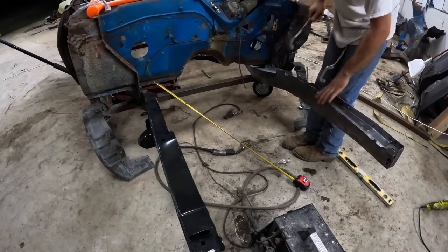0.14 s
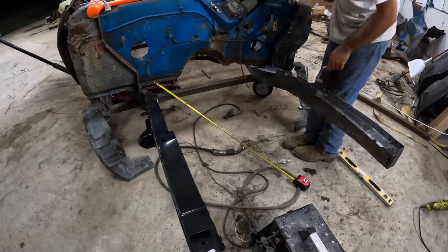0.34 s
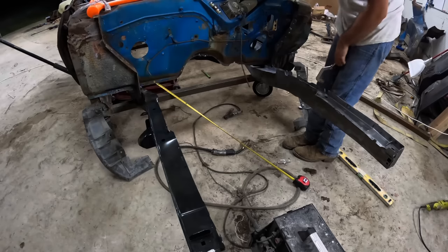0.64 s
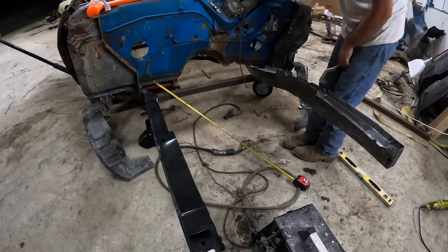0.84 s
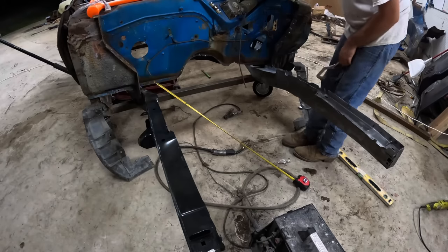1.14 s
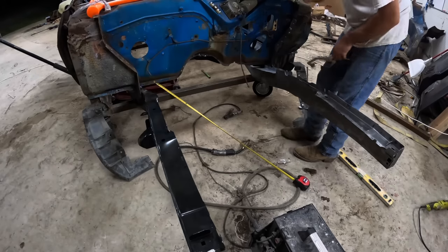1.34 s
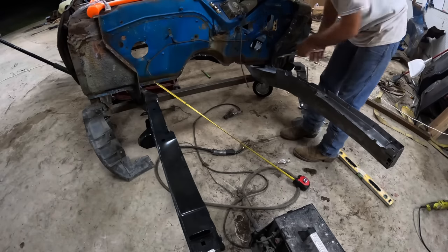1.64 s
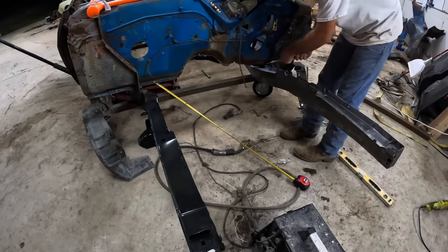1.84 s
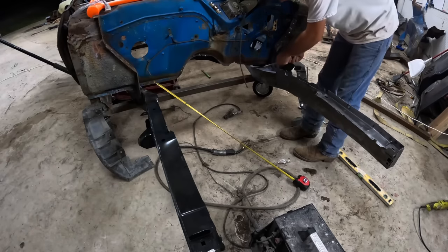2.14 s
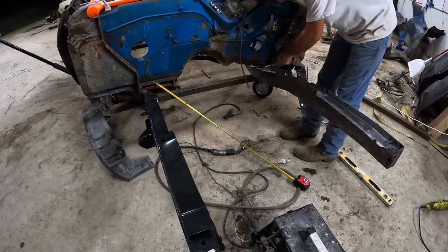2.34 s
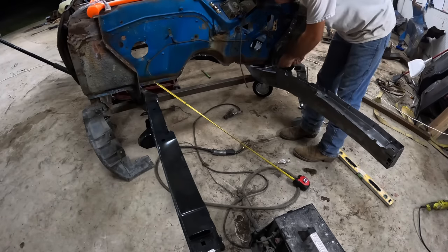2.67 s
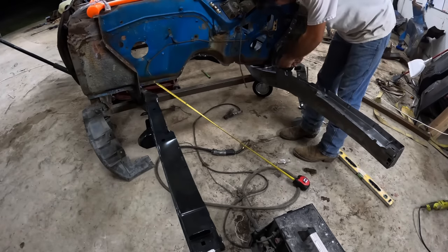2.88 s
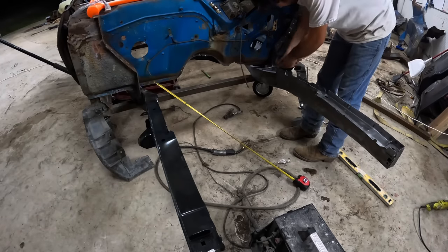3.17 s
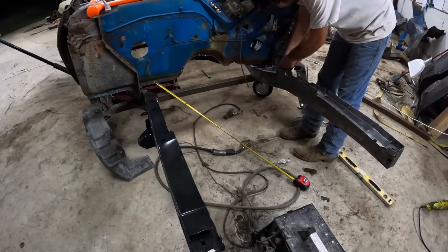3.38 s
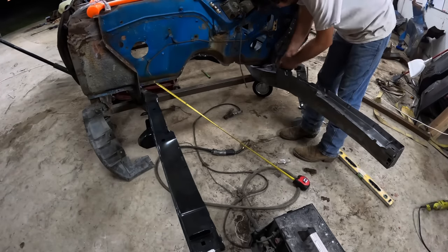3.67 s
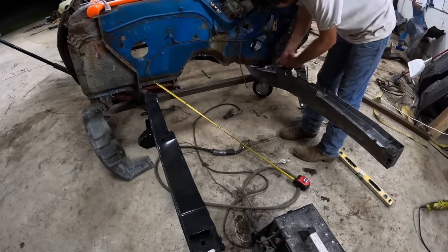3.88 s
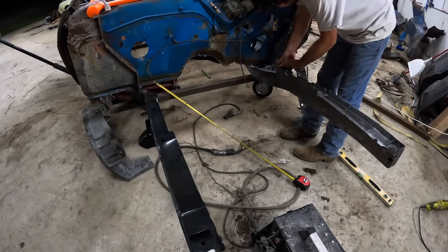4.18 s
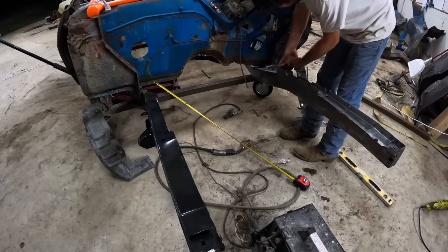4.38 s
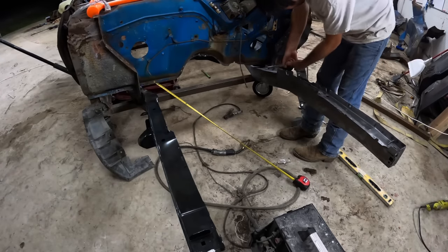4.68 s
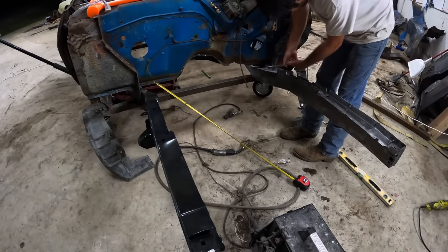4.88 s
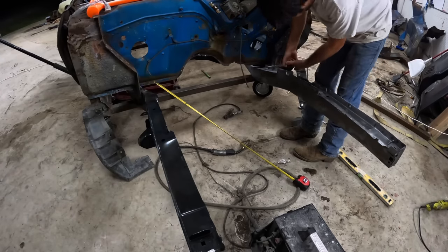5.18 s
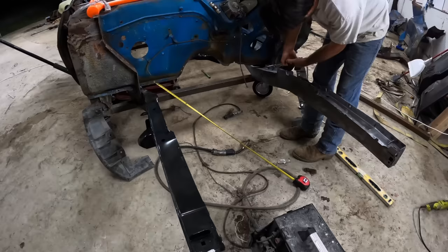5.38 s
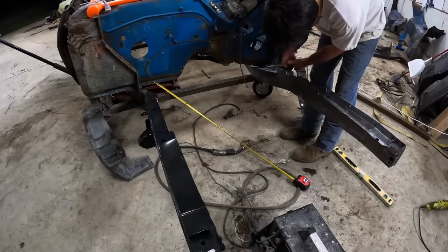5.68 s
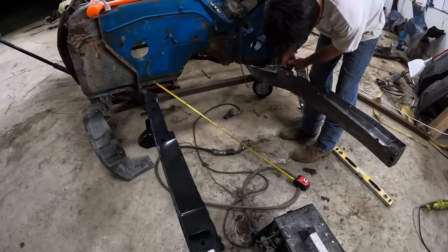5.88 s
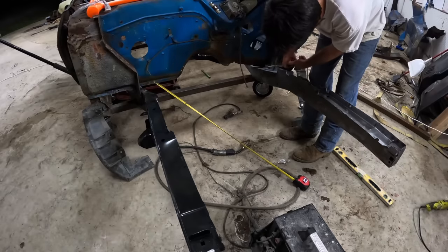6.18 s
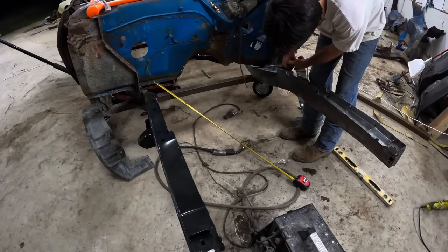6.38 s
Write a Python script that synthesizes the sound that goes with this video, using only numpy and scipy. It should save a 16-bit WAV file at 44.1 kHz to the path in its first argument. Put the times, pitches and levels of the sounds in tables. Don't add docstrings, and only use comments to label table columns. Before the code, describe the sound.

Hard, dry steel clanks with short booming body and high clamp rings come in uneven clusters, with small ticks and brief gritty rubs between. The shop adds a short tail. A distant truck swells behind them, rushes broadly as it crosses the doorway, then fades into quiet outdoor air with very faint insects.

```python
import sys
import numpy as np
from scipy import signal
from scipy.fft import rfft, irfft
from scipy.io import wavfile
from scipy.ndimage import uniform_filter1d

SR = 44100
rng = np.random.default_rng(int(sys.argv[2]) if len(sys.argv) > 2 else 0)


def put_to_file(sound):
    columns = np.atleast_2d(sound).T
    safe = np.clip(columns, -1, 1)
    whole_steps = np.round(safe * 32767)
    wavfile.write(sys.argv[1], SR, whole_steps.astype(np.int16))


def natural_amplitude(level_db):
    exponent = np.asarray(level_db, float) / 20
    return 10 ** exponent


N = 287532

# (frequency [Hz], density [dB per Hz])
AIR_SPECTRUM = [(13, -30), (22, 10.5), (44, 13.5), (79, -19), (99, 13), (180, -15.5), (286, -8), (522, -52),
                (853, -81), (1150, -16), (3000, -71), (4770, -44.5), (5170, -44), (11700, -67),
                (15000, -93)]
AIR_DB = -45.5
INSECT_HZ, INSECT_WIDTH_HZ, INSECT_DB = 4700, 170, -80.5
# (frequency [Hz], likeness [0-1])
PORT_LIKENESS = [(25, 0.9995), (70, 0.9999), (180, 1), (540, 0.97), (1630, 0.68), (4900, 0.78),
                 (14700, 0.44)]

# (time [s], drone level [dB], second order level [dB])
ENGINE_LEVELS = [(0, -50.5, -60), (.3, -43, -64.5), (1.0, -35, -56.5), (1.5, -57.5, -57),
                 (1.63, -35, -51.5), (2.0, -27.5, -64), (2.5, -29, -48.5), (2.72, -38.5, -42),
                 (2.86, -25.5, -65), (3.28, -22.5, -51), (3.62, -49, -39), (3.9, -32, -31),
                 (4.2, -25.5, -33.5), (4.6, -31, -42.5), (4.75, -40.5, -39), (5.3, -34, -48.5),
                 (5.58, -47, -54.5), (6.52, -76.5, -69.5)]
# (time [s], level [dB])
ROAR_LEVELS = [(0, -66.5), (.9, -58.5), (1.4, -56), (1.9, -49.5), (2.4, -41), (2.7, -43), (3.2, -51),
               (3.5, -41.5), (3.75, -37.5), (4, -40.5), (4.35, -48), (4.95, -52), (5.6, -58.5), (6.1, -62),
               (6.52, -68.5)]
# (frequency [Hz], density [dB per Hz])
ROAR_SPECTRUM = [(600, -38), (800, -16), (1000, -1), (1270, -1.5), (1600, -7), (2300, -16), (4000, -29.5),
                 (6000, -61)]
# (frequency [Hz], density [dB per Hz])
RUSH_SPECTRUM = [(470, -20), (800, -5), (1040, -5), (2400, -14), (4600, -18.5), (7400, -25), (8300, -35.5),
                 (12200, -44), (15000, -57.5)]
# (frequency [Hz], density [dB per Hz])
DRUMMING_SPECTRUM = [(250, -20), (330, -3.5), (450, 2), (600, -1), (800, -1.5), (1000, -8.5), (3000, -57)]
# (frequency [Hz], density [dB per Hz])
RUMBLE_SPECTRUM = [(90, 18.5), (130, 15), (250, 13.5), (330, 4), (450, -46.5)]
# (level [dB], share of the roar's swing [ratio], gain in the door [dB], gain with exhaust facing back [dB])
RUSH_FOLLOWS = (-60.5, 0.9433, 6.5, -0.7)
DRUMMING_FOLLOWS = (-62.5, 0.9532, 11.5, 7)
RUMBLE_FOLLOWS = (-47, 0.66, 2.5, 7)
# same columns, the first as gain [dB]
DEEP_AIR_FOLLOWS = (-0.85, 0.2, .1, 0.34)
DEEP_AIR_HZ = 110
FIRING_HZ, PASSING_S, SPEED_M_PER_S, DISTANCE_M = 82.86, 3.4, 34, 119
DOOR_S, DOOR_WIDTH_S = 3.52, 0.61
TURN_S, TURN_WIDTH_S = 2.7, 0.5

# (frequency [Hz], difference [dB])
ROAD_SIDE = [(60, 1), (240, 0.5), (940, 1.5), (3720, 2), (14700, 3)]
# (frequency [Hz], difference [dB])
STEEL_SIDE = [(60, 0), (150, -.4), (380, -1), (940, -2.5), (2350, -3.5), (5890, -1.5), (9000, 0),
              (14700, 8)]
STEEL_LAG_S = -0.0000091
# (frequency [Hz], t60 [s])
SHOP_DECAY = [(100, 0.35), (400, 0.59), (1500, 0.37), (5000, 0.83), (12000, 0.87)]
SHOP_DB, SHOP_SIDE_DB = -9.5, -6.5
# (frequency [Hz], gain [dB])
STEEL_TO_MIC = [(40, -24), (90, 4), (200, -0.5), (7400, -1.5), (8300, -4.5), (12000, -6), (14300, -17),
                (14700, -35), (15500, -68)]

# (start [s], hold [s], level [dB], release [dB per s])
SCRAPE_STROKES = [
    (-.05, .05, -57, 83),
    (1.453, 0.074, -57, 207),
    (5.434, 0.074, -49, 134),
    (5.717, .03, -60.5, 200),
]
# (frequency [Hz], density [dB per Hz])
SCRAPE_SPECTRUM = [(240, -32), (400, -3.5), (854, -16), (1090, -7), (1370, -10), (1500, -14), (4530, -10),
                   (10700, -28.5), (15000, -41)]
SCRAPE_ATTACK_DB_PER_S = 252
# (time [s], level [dB], centre [Hz], t60 [s])
RATTLE_EVENTS = [(.08, -59, 450, .6), (.94, -25, 1380, .08), (.962, -30, 1100, .25),
                 (1.003, -28.5, 800, .12), (1.045, -30, 1050, .25), (1.085, -39, 3900, 0.48),
                 (1.194, -26, 650, .12), (1.225, -33, 900, .2), (1.29, -33, 1050, .25),
                 (1.33, -36, 700, .25), (2.205, -32, 600, .3), (2.468, -43, 8900, .55),
                 (2.498, -34, 1100, 0.17), (2.73, -44, 2800, 0.18), (2.828, -26, 2160, .07),
                 (2.84, -38, 1790, .25), (3.855, -29, 800, .3), (3.87, -34, 2800, .3),
                 (3.895, -28.5, 1500, 0.27), (4.052, -43.5, 6270, 0.099), (4.83, -40, 420, .4),
                 (5.742, -40.5, 4000, .2), (5.762, -24, 4200, .07), (5.8, -45, 10300, 0.36),
                 (5.86, -43, 4200, 0.18), (5.86, -36, 330, .8)]
RATTLE_OCTAVES, RATTLE_GRIT_DB, RATTLE_RISE_S = 0.4, 4, 0.002
# (time [s], peak [dB],
# frequency [Hz], t60 [s])
STEEL_PINGS = [(.965, -29, 3800, .12), (.94, -21.5, 2200, .05), (.95, -26, 2000, .1),
               (1.024, -24.5, 5000, 0.049), (1.025, -31, 5700, .04), (1.035, -34, 3800, .1),
               (1.043, -33, 6400, .06), (1.07, -37, 5900, .2), (1.203, -37, 3750, .1),
               (1.2, -28, 1150, 0.073), (1.215, -28, 900, 0.081), (1.255, -36, 1600, .05),
               (1.285, -29, 1200, .05), (2.729, -40, 3150, .1), (2.729, -37, 2550, .06),
               (2.827, -25, 1100, 0.052), (2.828, -28.5, 1550, 0.083), (2.468, -30, 9000, .04),
               (2.255, -22.5, 3500, .05), (2.262, -33, 5700, .08), (4.815, -22.5, 940, 0.074),
               (4.885, -52, 6800, .03), (1.308, -42, 5920, .04), (2.184, -31.5, 6480, 0.09),
               (2.468, -26.5, 3100, 0.14), (2.468, -26, 6900, .03), (0.953, -19.5, 960, .05),
               (1.04, -22, 970, 0.17), (6.369, -39, 1110, 0.077), (.943, -15, 1490, 0.046),
               (2.829, -26.5, 2430, 0.035), (2.83, -34, 2980, 0.033), (1.295, -30, 810, 0.059),
               (2.632, -58, 11000, .1), (3.2, -58, 11300, .2), (3.5, -45, 7200, 0.11),
               (3.85, -29, 5400, 0.05), (3.866, -35, 5400, .12), (3.89, -58, 11400, 0.32),
               (3.89, -31, 4900, .06), (3.9, -36, 3920, .25), (3.9, -43, 4900, .2),
               (5.808, -41, 10300, 0.032), (4.059, -60, 11200, .12), (4.813, -40, 7100, 0.023),
               (5.752, -44, 11200, .05), (5.78, -28, 6550, .07), (5.776, -35, 11070, 0.057),
               (5.805, -30, 6670, .035)]
TWIN_HZ, TWIN_DB = 54.6, -4

# (frequency [Hz], level [dB], t60 [s])
BEAM_MODES = [(100, 3.5, 0.39), (161, -15.5, 0.12), (190, 1.5, 0.52), (225.5, 3.5, 0.13),
              (265.8, 6.5, 0.27), (298.7, -1.5, 0.071), (323, 10.5, 0.067), (361, 6, 0.087),
              (374.8, 1.5, 0.22), (395.5, 2.5, 0.38), (455, 5, 0.35), (455, 3, 0.074), (547, 5.5, 0.061),
              (564, 1.5, 0.069), (599, 2, 0.13), (642, -2, 0.24), (686.5, -0.5, 0.3), (737, 1.5, 0.15),
              (905, -0.5, 0.23), (957, 6, 0.074), (1045, -9.5, 0.36), (1200, 0, 0.098), (1402, -6.5, 0.15),
              (1500, -14, 0.092), (1620, -15, 0.09), (1865, -11, 0.15), (2140, -11, 0.19),
              (2370, -29, 0.092), (2576, -1, 0.049)]
# (frequency [Hz], width [Hz], level over the clatter [dB])
SHEEN_MODES = [(1698, 25, 7), (1972, 25, 4.5), (2088, 23, 6), (2510, 25, 8.5), (2670, 20, 6.5),
               (3060, 30, 4), (3206, 34, 7.5), (3530, 40, 5.5), (3660, 30, 8.5), (3900, 35, 7.5),
               (4380, 37, 4), (4650, 30, 2.5), (4890, 33, 6), (5460, 40, 6.5), (5940, 45, 5), (6470, 45, 9),
               (8970, 250, 1.5)]
# (time [s], peak [dB], loudest pitch [Hz])
BEAM_BOOMS = [(.002, -38.5, 425), (.942, -17.5, 596), (.953, -8.5, 300), (.975, -15, 266),
              (1.002, -15.5, 361), (1.029, -14, 318), (1.059, -21, 268), (1.1, -35.5, 263),
              (1.192, -10.5, 334), (1.2, -16, 605), (1.244, -13, 290), (1.256, -18.5, 455),
              (1.282, -18, 288), (1.304, -16, 323), (1.338, -22.5, 205), (2.183, -28, 513),
              (2.205, -21, 190), (2.229, -21, 240), (2.282, -24, 455), (2.468, -22, 440), (2.482, -26, 526),
              (3.889, -20.5, 390), (3.915, -17.5, 236), (4.819, -27.5, 200), (5.762, -15.5, 337),
              (5.767, -22, 100), (5.775, -13.5, 221), (5.809, -17, 286), (5.83, -20, 302),
              (6.385, -34, 321)]
BOOM_OCTAVES, PUSH_S = 0.36, 0.0065
# (time [s], peak [dB], loudest pitch [octaves over 1 kHz], fall [dB per octave], chatter [s])
HEAVY_BLOWS = [(.9385, -12.5, 0.01, 4.5, 0.0064), (.9465, -13, 3.5, 0, 0.004),
               (.953, -8, 0.28, 15.5, 0.014), (1.193, -21, .01, 7, 0.0017), (2.183, -14, .01, 7.5, 0.012),
               (2.251, -11, 1.46, 11.5, 0.011), (2.256, -12.5, 0.71, 10, 0.007),
               (2.46, -27, 2.5, -1, 0.0026), (2.465, -22, 1.4, 5, 0.0069), (2.468, -25, 0.51, 1.5, 0.0073),
               (2.827, -12.5, 0.7, 25.5, 0.0068), (3.8415, -22, .5, 8, 0.003),
               (3.846, -16.5, .01, 3.5, 0.0042), (3.888, -13.5, 1.3, 6, 0.0056),
               (4.813, -21.5, .3, 7.5, 0.0043), (5.751, -19, .01, 5, 0.0078), (5.761, -11, 0.6, 5.5, 0.007),
               (5.779, -15, .01, 5, 0.0071)]
# (time [s], peak [dB], loudest pitch [octaves over 1 kHz], fall [dB per octave], chatter [s])
BEAM_REBOUNDS = [(.984, -18.5, 0.58, 8.3, 0.04), (1.024, -16.5, 1.5, 3, 0.02), (1.059, -28, 2.8, 2.2, 0.04),
                 (1.099, -30.5, 2.2, 6.7, 0.028), (1.202, -20, 0.0083, 6.1, 0.019),
                 (1.242, -18, 0.011, 11, 0.028), (1.285, -15.5, 0.009, 40, 0.01),
                 (1.309, -25, .01, 9, 0.013), (1.471, -28.5, 0.41, 10.4, 0.02),
                 (2.199, -22, .01, 10.6, 0.016), (2.269, -18, .01, 6.3, 0.028),
                 (2.481, -18.5, 0.0083, 4.1, .0088), (2.499, -21, 0.35, 13, 0.005),
                 (3.804, -15, 0.011, 12, 0.087), (3.893, -12, 1.0, 7.2, 0.012),
                 (4.824, -34, .01, 25, .0051), (5.725, -30.5, 0.23, 9, .012), (5.741, -19, .01, 11, .013),
                 (5.804, -27, 2.5, 3.2, 0.005), (6.384, -29, .01, 17, 0.012)]
# (time [s], peak [dB], loudest pitch [octaves over 1 kHz], fall [dB per octave])
LIGHT_TICKS = [
    (1.439, -42.5, 2, 3),
    (1.788, -41, 1.4, 10),
    (1.876, -40.5, 2.3, 6),
    (2.632, -34, .01, 4),
    (2.729, -32, 1.2, 30),
    (3.199, -34.5, 2.2, 4),
    (4.054, -34.5, .01, 1),
    (5.204, -53, .01, -2),
    (5.276, -49, .01, 0.5),
    (6.365, -33, .01, 8),
]
TICK_CHATTER_S, TOP_LOSS_DB = 0.0032, 4.5
CRACK_DB, RINGS_DB, CLATTER_T60_S = 4.5, -11.5, 0.19
STRIKE = 8192


def rms_one(x):
    return x / np.sqrt(np.mean(x ** 2) + 1e-20)


def in_time(rows):
    s, *columns = np.transpose(rows)
    return [np.interp(np.arange(N) / SR, s, column) for column in columns]


def at_hz(points, hz):
    point_hz, values = np.transpose(points)
    return np.interp(np.log(np.maximum(hz, 1)), np.log(point_hz), values)


def drift(rate_hz):
    r = np.exp(-80 * np.pi * rate_hz / SR)
    white = rng.standard_normal(N // 40 + 2002)
    slow = signal.lfilter([1], [1, -2 * r, r * r], white)[2000:]
    return np.interp(np.arange(N) / 40, np.arange(len(slow)), rms_one(slow))


def far_noise(spectrum, band_hz):
    hz = np.fft.rfftfreq(N, 1 / SR)
    mid, side = rfft(rng.standard_normal((2, N)))
    alike = np.clip(at_hz(PORT_LIKENESS, hz), -1, 1)
    gain = natural_amplitude(at_hz(spectrum, hz)) * (hz > 0.7 * spectrum[0][0])
    in_band = (hz > band_hz[0]) & (hz < band_hz[1])
    gain /= np.sqrt(np.sum(gain[in_band] ** 2) / len(hz))
    opposite = np.array([[1], [-1]])
    pair = np.sqrt((1 + alike) / 2) * mid + np.sqrt((1 - alike) / 2) * side * opposite
    return irfft(gain * pair, N)


def follows_truck(level_db, share, door_db, behind_db):
    t = np.arange(N) / SR
    in_door = np.exp(-((t - DOOR_S) / DOOR_WIDTH_S) ** 2)
    behind = 0.5 + 0.5 * np.tanh((t - TURN_S) / TURN_WIDTH_S)
    swing_db = in_time(ROAR_LEVELS)[0] + 50
    return level_db + share * swing_db + door_db * in_door + behind_db * behind


def air():
    floor = natural_amplitude(AIR_DB) * far_noise(AIR_SPECTRUM, (22, 15000))
    low_pass = signal.butter(2, DEEP_AIR_HZ, fs=SR, output="sos")
    deep = signal.sosfiltfilt(low_pass, floor)
    swell = natural_amplitude(follows_truck(*DEEP_AIR_FOLLOWS)) - 1
    reach_hz = 2 * INSECT_WIDTH_HZ
    band = [(INSECT_HZ - reach_hz, -30), (INSECT_HZ, 0), (INSECT_HZ + reach_hz, -30), (12000, -80)]
    insects = natural_amplitude(INSECT_DB + 0.99 * drift(3)) * far_noise(band, (3000, 7000))
    return floor + swell * deep + insects


def road():
    roar_db = in_time(ROAR_LEVELS)[0]
    rush_db, drumming_db = follows_truck(*RUSH_FOLLOWS), follows_truck(*DRUMMING_FOLLOWS)
    roar = natural_amplitude(roar_db + 1.55 * drift(25)) * far_noise(ROAR_SPECTRUM, (900, 1600))
    drumming = natural_amplitude(drumming_db + 1.2 * drift(15)) * far_noise(DRUMMING_SPECTRUM, (300, 800))
    rush = natural_amplitude(rush_db + 0.6 * drift(20)) * far_noise(RUSH_SPECTRUM, (2500, 7000))
    return roar + drumming + rush


def firing_hz():
    along_m = SPEED_M_PER_S * (np.arange(N) / SR - PASSING_S)
    receding = along_m / np.hypot(along_m, DISTANCE_M)
    return FIRING_HZ * (1 - SPEED_M_PER_S / 343 * receding)


def engine():
    drone_db, second_db = in_time(ENGINE_LEVELS)
    rumble_db = follows_truck(*RUMBLE_FOLLOWS)
    phase = 2 * np.pi * np.cumsum(firing_hz()) / SR + 0.3 * drift(3)
    drone = natural_amplitude(drone_db + 1.64 * drift(34)) * np.sin(phase)
    second = natural_amplitude(second_db + 1.2 * drift(15)) * np.sin(2 * phase + 0.63 + 0.2 * drift(4))
    throb = 1 + 0.31 * np.sin(phase)
    rumble = far_noise(RUMBLE_SPECTRUM, (100, 330)) * throb
    return np.sqrt(2) * (drone + second) + natural_amplitude(rumble_db - 3 + 1.2 * drift(22)) * rumble


def placed(x, lean, lag_s):
    hz = np.fft.rfftfreq(N, 1 / SR)
    half = np.array([[0.5], [-0.5]])
    colour = natural_amplitude(at_hz(lean, hz) * half)
    delay = np.exp(-2j * np.pi * hz * lag_s * half)
    return irfft(rfft(x) * colour * delay, N)


def shop(x):
    t = np.arange(SR) / SR
    white = rng.standard_normal((2, SR))
    tail = 0
    for octave in range(8):
        low = 70 * 2 ** octave
        band = signal.sosfilt(signal.butter(2, [low, 2 * low], "band", fs=SR, output="sos"), white)
        t60 = at_hz(SHOP_DECAY, low * np.sqrt(2))
        dying = natural_amplitude(-60 * t / t60) * (1 - np.exp(-t / 0.0042))
        tail = tail + (-1) ** octave * band * dying / np.sqrt(np.sum(dying ** 2))
    side = signal.sosfilt(signal.butter(2, 700, "high", fs=SR, output="sos"), tail[1])
    pair = tail[0] + natural_amplitude(SHOP_SIDE_DB) * side * np.array([[1], [-1]])
    return natural_amplitude(SHOP_DB) * signal.fftconvolve(x[None], pair, axes=1)[:, :N]


def scrapes():
    t = np.arange(N) / SR
    stroke = 0
    for s, hold_s, level_db, release_db in SCRAPE_STROKES:
        attack = SCRAPE_ATTACK_DB_PER_S * np.maximum(s - t, 0)
        release = release_db * np.maximum(t - s - hold_s, 0)
        stroke = stroke + natural_amplitude(level_db - attack - release)
    return stroke * natural_amplitude(drift(60)) * far_noise(SCRAPE_SPECTRUM, (2500, 9000))


def rattles():
    out, t = np.zeros(N + SR), np.arange(SR // 2) / SR
    grit = rng.standard_normal((len(RATTLE_EVENTS), 2, len(t)))
    for (s, level_db, hz, t60), (white, size) in zip(RATTLE_EVENTS, grit):
        half_octaves = RATTLE_OCTAVES * min(1, (2500 / hz) ** 0.7)
        edges = hz * 2.0 ** (np.array([-1, 1]) * half_octaves)
        resonance = signal.butter(3, edges, "band", fs=SR, output="sos")
        band = signal.sosfilt(resonance, white * natural_amplitude(RATTLE_GRIT_DB * size))
        envelope = natural_amplitude(level_db - 60 * t / t60) * (1 - np.exp(-t / RATTLE_RISE_S))
        out[round(s * SR):][:len(t)] += envelope * rms_one(band)
    return out[:N]


def pings():
    out, t = np.zeros(N + SR), np.arange(SR // 2) / SR
    for s, peak_db, hz, t60 in STEEL_PINGS:
        pair = np.sin(2 * np.pi * hz * t) + natural_amplitude(TWIN_DB) * np.sin(2 * np.pi * (hz + TWIN_HZ) * t)
        envelope = natural_amplitude(peak_db - 1.5 - 60 * t / t60) * (1 - np.exp(-t / 0.00025))
        out[round(s * SR):][:len(t)] += envelope * pair
    return out[:N]


def ringing(hz, db, t60):
    t = np.arange(STRIKE) / SR
    decay = natural_amplitude(np.c_[db] - 60 * t / np.c_[t60])
    return rfft(decay * np.sin(2 * np.pi * np.c_[hz] * t))


def chatter(lengths_s, rise):
    t, shape = np.arange(STRIKE) / SR, (len(lengths_s), STRIKE)
    cycles = t / np.clip(np.c_[lengths_s], 0.0008, 0.05)
    grit = rng.standard_normal(shape) * natural_amplitude(2.97 * rng.standard_normal(shape))
    return rfft(grit * np.exp(-cycles) * (1 - np.exp(-cycles / rise)))


def add_strike(out, s, spectrum, even, peak_db):
    fade = np.cos(np.linspace(0, np.pi / 2, STRIKE) ** 2 * 2 / np.pi)
    part, click = fade * irfft(spectrum, STRIKE), fade * irfft(even, STRIKE)
    part *= natural_amplitude(peak_db) / np.sqrt(uniform_filter1d(part ** 2, size=256).max())
    click *= np.sqrt(np.sum(part ** 2) / np.sum(click ** 2))
    out[:, round(s * SR):][:, :STRIKE] += [part, click]


def booms():
    at_s, peak_db, loudest_hz = np.transpose(BEAM_BOOMS)
    mode_hz = np.array(BEAM_MODES)[:, 0]
    octaves_off = np.log2(mode_hz / np.c_[loudest_hz])
    near = 1 / (1 + (octaves_off / BOOM_OCTAVES) ** 4)
    strength = near * natural_amplitude(rng.normal(0, 1.3, near.shape))
    pushes = chatter(np.full(len(at_s), PUSH_S), 0.49)
    pushes /= uniform_filter1d(np.abs(pushes), size=15, axis=1)
    bodies = pushes * (strength @ ringing(*np.transpose(BEAM_MODES)))
    out = np.zeros((2, N + STRIKE))
    for s, level_db, body in zip(at_s, peak_db, bodies):
        add_strike(out, s, body, body, level_db - 5.5)
    return out[:, :N]


def blows(table, rise, clatter_db, trim_db):
    t, hz = np.arange(STRIKE) / SR, np.fft.rfftfreq(STRIKE, 1 / SR)
    edges = [([600, 1500], "band"), ([1500, 3500], "band"), ([3500, 7000], "band"), (7000, "high")]
    ranges = []
    for edge_hz, kind in edges:
        sos = signal.butter(2, edge_hz, kind, fs=SR, output="sos")
        ranges.append(signal.sosfreqz(sos, hz, fs=SR)[1])
    rings = rng.standard_normal((len(table), len(BEAM_MODES))) @ ringing(*np.transpose(BEAM_MODES))
    dying = natural_amplitude(clatter_db - 60 * t / CLATTER_T60_S)
    clatter = rfft(rng.standard_normal((len(table), STRIKE)) * dying)
    sheen = sum(natural_amplitude(db) / (1 + 2j * (hz - mode_hz) / width_hz) for mode_hz, width_hz, db in SHEEN_MODES)
    clatter = clatter * (1 + sheen)
    cracks = natural_amplitude(CRACK_DB) * chatter(np.array(table)[:, -1], rise)
    bodies = cracks + clatter + natural_amplitude(RINGS_DB) * rings
    out = np.zeros((2, N + STRIKE))
    octaves = np.array([0, 1.2, 2.3, 3.3])
    loss_db = TOP_LOSS_DB * np.array([0, 0, 0, 1])
    for (s, peak_db, loudest, fall_db, _), body in zip(table, bodies):
        levels_db = peak_db - fall_db * np.abs(octaves - loudest) - loss_db
        for sign, level_db, passed in zip([1, -1, 1, -1], levels_db, ranges):
            add_strike(out, s, sign * body * passed, sign * passed, level_db + trim_db)
    return out[:, :N]


def scene():
    ticks = [(*row, TICK_CHATTER_S) for row in LIGHT_TICKS]
    struck = blows(HEAVY_BLOWS + ticks, 0.13, -11.5, -7)
    rocking = blows(BEAM_REBOUNDS, 0.48, -24.5, -14.0)
    direct, to_walls = struck + rocking + booms()
    pinged = pings()
    near = placed(direct + pinged, STEEL_SIDE, STEEL_LAG_S) + shop(to_walls + natural_amplitude(-16) * pinged)
    to_mic = natural_amplitude(at_hz(STEEL_TO_MIC, np.fft.rfftfreq(N, 1 / SR)))
    near = irfft(rfft(near) * to_mic, N)
    rest = scrapes() + engine() + placed(road(), ROAD_SIDE, 0) + air()
    loose = rattles()
    return near + rest + placed(loose, STEEL_SIDE, STEEL_LAG_S) + shop(natural_amplitude(-6) * loose)


def roll_off(x):
    return signal.sosfilt(signal.butter(12, 15000, fs=SR, output="sos"), x)


def record(dry):
    return roll_off(dry)


dry = scene()
out = record(dry)
put_to_file(out)
```